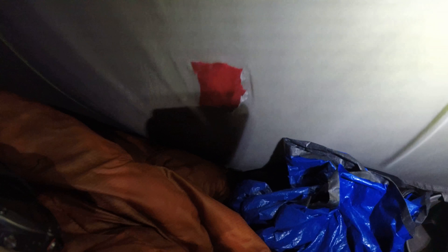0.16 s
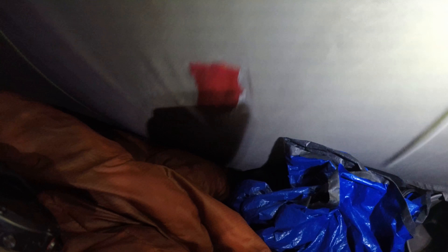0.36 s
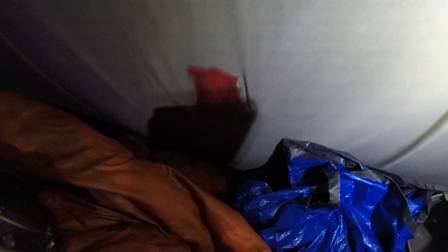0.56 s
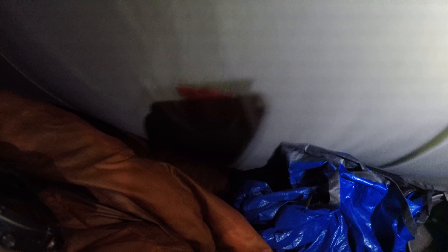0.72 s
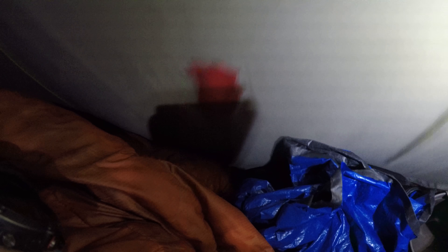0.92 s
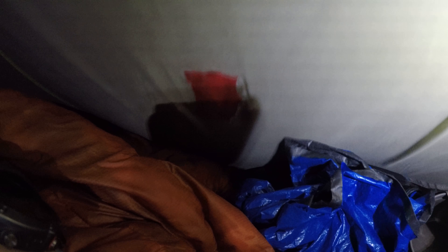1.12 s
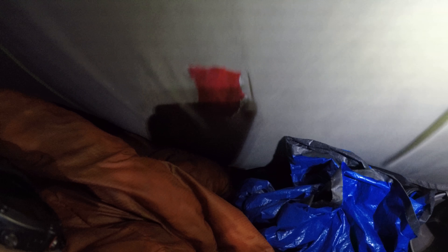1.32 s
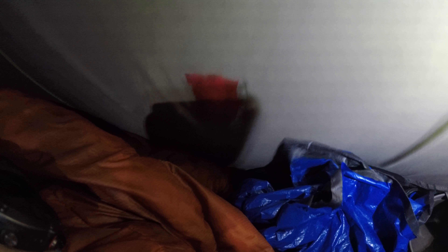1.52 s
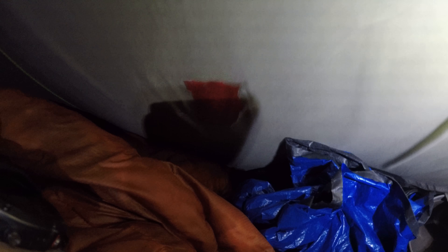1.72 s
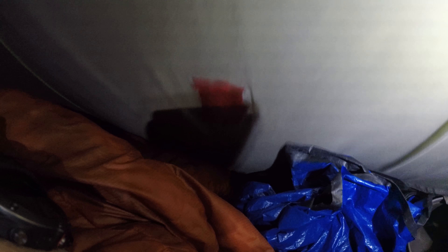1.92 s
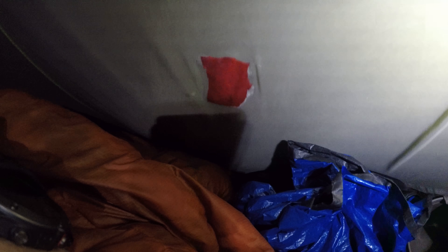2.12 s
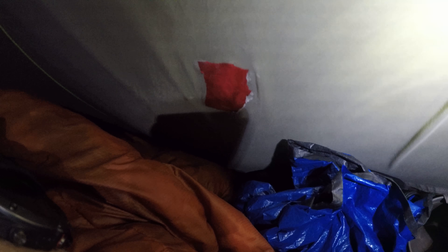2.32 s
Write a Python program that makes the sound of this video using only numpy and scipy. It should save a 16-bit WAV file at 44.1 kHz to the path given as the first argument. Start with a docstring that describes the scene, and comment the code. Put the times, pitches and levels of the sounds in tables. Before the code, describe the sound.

Strong wind buffets a tent, heard from inside close to the wall. A deep rumble swells quickly, and the cloth shakes in fast, uneven flaps with crackling creases, dull knocks and sharp snaps over rushing air.

```python
"""Inside a tent, close to the wall, in strong wind. Gusts pump the wall, which rumbles, and shake
the cloth in quick, uneven flaps. Each flap thuds and stirs up crackling creases over the rush of
air on the fabric. Now and then a fold pops through with a dull knock, or the cloth snaps taut.
Only a thin, high sizzle is spread between left and right; the rest sits in the middle."""
import sys
import numpy as np
from scipy import signal
from scipy.fft import rfft, irfft
from scipy.io import wavfile
from scipy.ndimage import uniform_filter1d, map_coordinates

SR = 44100
rng = np.random.default_rng(int(sys.argv[2]) if len(sys.argv) > 2 else 0)


def wav_out(sig):
    """Save sig, one row per channel (or a flat mono array), as 16-bit PCM at SR to the path in sys.argv[1]."""
    wavfile.write(sys.argv[1], SR, np.round(np.clip(np.atleast_2d(sig).T, -1, 1) * 32767).astype(np.int16))


N = 104384

# Levels in the tables are relative: each layer is turned up or down as it is mixed.
# how hard the gusts pump the wall (t/s, level/dB)
RUMBLE_LEVEL = [(0.12, -50), (0.28, -17), (0.31, -23.5), (0.59, -13.5), (0.68, -20), (0.78, -11),
                (0.81, -19), (0.84, -10.5), (1.16, -12.5), (1.41, -18.5), (1.46, -15), (1.54, -15.5),
                (1.61, -11), (1.7, -17.5), (1.9, -12), (1.93, -21.5), (2.05, -12), (2.19, -24),
                (2.22, -14.5), (2.35, -20)]
# tone of the rumbling wall (f/Hz, level/dB)
RUMBLE_TONE = [(11, -28), (18, 1.5), (74, 1.5), (164, -3.5), (240, -12.5), (310, -41.5), (530, -120)]
# how hard the cloth drums (t/s, level/dB)
DRUM_LEVEL = [(0.12, -57.5), (0.29, -23), (0.52, -29.5), (0.57, -19.5), (0.69, -28.5), (0.7, -25),
              (1.03, -18), (1.44, -27.5), (1.45, -20.5), (1.49, -28.5), (1.55, -21.5), (1.58, -23.5),
              (1.6, -18), (1.63, -27), (1.64, -20), (1.74, -30), (1.8, -22), (1.85, -27.5), (1.88, -19),
              (1.93, -27.5), (1.94, -23.5), (2.03, -29), (2.04, -21.5), (2.08, -24.5), (2.09, -19.5),
              (2.13, -28), (2.33, -19.5), (2.35, -30)]
# tone of the drumming cloth (f/Hz, level/dB)
DRUM_TONE = [(130, -28.5), (220, 0.5), (382, -5), (500, -4.5), (638, -6), (757, -7.5), (877, -14.5),
             (950, -19), (1240, -41), (2090, -120)]
# how loudly the gusts rustle the cloth (t/s, level/dB)
RUSTLE_LEVEL = [(0.12, -60.5), (0.16, -48.5), (0.22, -45.5), (0.27, -32), (0.34, -36), (0.35, -33),
                (0.47, -33.5), (0.48, -28), (0.49, -35), (0.57, -20.5), (0.66, -32.5), (0.71, -22.5),
                (0.73, -28.5), (0.74, -21), (0.79, -24.5), (0.87, -19.5), (0.97, -26), (0.99, -20),
                (1.01, -24), (1.12, -24.5), (1.14, -29), (1.15, -23.5), (1.26, -28), (1.28, -23),
                (1.3, -32), (1.33, -26.5), (1.39, -33), (1.44, -32), (1.45, -24.5), (1.46, -31),
                (1.53, -30), (1.55, -22), (1.66, -24.5), (1.67, -28.5), (1.74, -34.5), (1.78, -29),
                (1.9, -25), (1.91, -29), (2.09, -28), (2.13, -38), (2.25, -23), (2.26, -27.5),
                (2.34, -24.5), (2.35, -32.5)]
# tone of the rustle and the snaps (f/Hz, level/dB)
RUSTLE_TONE = [(530, -44.5), (900, -6), (1480, 0.5), (2150, -9.5), (2450, -8.5), (2880, -10.5), (5210, -12),
               (6180, -20.5), (8450, -20.5), (11100, -39), (11800, -42), (15300, -58), (22000, -120)]
# treble of the rustle and the snaps, opening during the first second (t/s, level/dB)
TREBLE_GAIN = [(0.15, -7), (0.4, -6.5), (0.6, -3), (0.85, 0.5), (1.3, 1), (2.3, -0.5)]
# folds popping through (t/s, knock level/dB, knock f/Hz, upper ring level/dB)
FOLD_POPS = [(0.357, -8, 337, -31), (0.565, -11, 650, -16), (0.769, -11, 328, -12), (0.989, -10, 590, -17),
             (1.058, -15, 301, -22), (1.08, -7, 426, -15), (1.148, -21, 490, -13), (1.194, -10, 436, -12),
             (1.605, -6, 342, -16.5), (1.882, -7, 350, -35), (2.042, -13, 323, -24), (2.091, -10, 616, -28)]
# the cloth snapping taut (t/s, level/dB)
TAUT_SNAPS = [(0.4747, -15), (0.549, -5), (0.5657, -8), (0.5804, -11), (0.6144, -13), (0.705, -6),
              (0.7414, -17), (0.876, -5), (0.911, -9), (1.056, -11), (1.1104, -7), (1.1436, -5),
              (1.171, -6), (1.181, -14), (1.2794, -21), (1.4451, -9), (1.5993, -17), (1.635, -17),
              (1.653, -6.5), (1.8624, -5), (1.883, -8), (1.8964, 0), (2.0655, -7), (2.251, -15)]
# loudness of the thin sizzle on top of the rustle (t/s, level/dB)
SIZZLE_LEVEL = [(0.17, -88), (0.48, -86), (0.53, -86), (1.33, -53), (1.44, -61), (1.45, -51), (1.49, -60),
                (1.6, -47), (1.75, -61), (1.89, -45), (1.91, -56.5), (1.96, -50), (2.08, -53), (2.14, -62),
                (2.32, -54), (2.35, -58)]
# tone of that sizzle (f/Hz, level/dB)
SIZZLE_TONE = [(6880, -44), (11700, -1.5), (12400, 10), (13000, 7.5), (15500, 1)]


def undb(db):
    """Turn decibels into a number to multiply by."""
    return 10 ** (np.asarray(db) / 20)


def unit(x):
    """Scale a signal so that its average strength (rms) is 1."""
    return x / np.sqrt(np.mean(x ** 2) + 1e-18)


def curve(table):
    """Join rows of (t/s, level/dB) into a volume curve."""
    seconds, db = np.array(table).T
    return undb(np.interp(np.arange(N) / SR, seconds, db))


def colour(x, tone):
    """Filter through rows of (f/Hz, level/dB); white noise keeps its power."""
    size = 2 * N
    hz, db = np.array(tone).T
    bin_hz = np.arange(N + 1) * SR / size
    gain = unit(undb(np.interp(np.log(bin_hz + 1), np.log(hz), db)))
    # make the filter ring only after a click, never before it
    cepstrum = irfft(np.log(gain + 1e-5))
    cepstrum[1:N] *= 2
    cepstrum[N + 1:] = 0
    return irfft(rfft(x, size) * np.exp(rfft(cepstrum)))[:N]


def wander(per_s):
    """Drift smoothly between random values, typically about 1 away from zero."""
    steps = rng.standard_normal(2048)
    return unit(map_coordinates(steps, [np.arange(N) / SR * per_s], order=3, mode="wrap"))


def clicks(per_s, scatter_db):
    """Pushes at random times; more scatter makes their sizes less even."""
    hits = rng.random(N) < per_s / SR
    return hits * undb(scatter_db * np.clip(rng.standard_normal(N), -2, 2))


def grains(pushes):
    """Flip each push up or down at random and scale the result to strength 1."""
    return unit(pushes * np.sign(rng.standard_normal(N)))


def burst(start_s, rise_s, decay_s):
    """Rise quickly to 1, then die away."""
    age = np.maximum(np.arange(N) / SR - start_s, 0)
    shape = (1 - np.exp(-age / rise_s)) * np.exp(-age / decay_s)
    return shape / (shape.max() + 1e-12)


def steady(x, seconds):
    """Hold the strength near 1 over the given time, so the gusts set the slow swells."""
    power = uniform_filter1d(x ** 2, int(seconds * SR))
    return x / np.sqrt(np.abs(power) + 1e-9)


def wall_rumble():
    """Gusts push the whole wall, which pumps the air inside."""
    rumble = colour(rng.standard_normal(N), RUMBLE_TONE)
    return steady(rumble, seconds=0.053) * curve(RUMBLE_LEVEL)


def drumming(flaps, motion):
    """Thudding flaps and small ripples drum on the cloth."""
    thuds = grains(flaps)
    ripples = unit(grains(clicks(per_s=600, scatter_db=-1.5)) * motion)
    drum = colour(ripples + 0.35 * thuds, DRUM_TONE)
    return undb(0.5) * steady(drum, seconds=0.0476) * curve(DRUM_LEVEL)


def tick():
    """The volume curve of one faint, high tick as the wind sets in."""
    return undb(-46) * burst(0.12, rise_s=0.0006, decay_s=0.008)


def panel_flutter(x):
    """Different panels take turns: each octave wavers slowly and flutters fast on its own."""
    spectrum = rfft(x)
    octave = np.log2(np.arange(N // 2 + 1) * SR / N + 1)
    lowest = np.floor(np.log2(RUSTLE_TONE[0][0]))
    panels = np.zeros(N)
    for centre in np.arange(lowest, np.ceil(octave[-1]) + 1):
        band = irfft(spectrum * np.maximum(1 - abs(octave - centre), 0), N)
        panels += band * undb(0.46 * wander(per_s=20) + 1.29 * wander(per_s=150))
    return panels


def rustle(motion, creases):
    """Air rushes over the cloth and creases crackle, both swelling with each flap."""
    rush = undb(-1) * rng.standard_normal(N)
    crackle = undb(-5.5) * creases
    cloth = colour((rush + crackle) * motion, RUSTLE_TONE)
    return panel_flutter(cloth) * curve(RUSTLE_LEVEL)


def open_treble(cloth, above_hz=5640):
    """The cloth starts out dull and grows brighter during the first second."""
    dull = signal.sosfiltfilt(signal.butter(8, above_hz, fs=SR, output="sos"), cloth)
    return dull + (cloth - dull) * curve(TREBLE_GAIN)


def fold_knocks(upper_hz=1393):
    """A fold pops through: its patch rings briefly at its own pitch and at the cloth's upper note."""
    knocks = np.zeros(N)
    for start, db, hz, upper_db in FOLD_POPS:
        age = np.arange(N) / SR - start
        low = undb(db - 2.5) * np.sin(2 * np.pi * hz * age)
        upper = undb(upper_db - 0.5) * np.sin(2 * np.pi * upper_hz * age)
        knocks += (low + upper) * burst(start, rise_s=0.0011, decay_s=0.0025)
    return knocks


def snaps(low_cut_hz=1900):
    """The cloth pulls taut with a short, bright crack."""
    level = sum(undb(db - 12.5) * burst(start, rise_s=0.0006, decay_s=0.0029)
                for start, db in TAUT_SNAPS)
    cracks = colour(level * rng.standard_normal(N), RUSTLE_TONE)
    low_cut = signal.butter(2, low_cut_hz, "high", fs=SR, output="sos")
    return signal.sosfilt(low_cut, cracks)


def sizzle(motion, creases, width=0.94):
    """The thin top of the rustle, in stereo: it gives the opening tick, then slowly swells."""
    level = undb(4) * curve(SIZZLE_LEVEL) * motion + tick()
    hiss = unit(rng.standard_normal(N) + undb(-10) * creases)
    middle = colour(hiss * level, SIZZLE_TONE)
    side = colour(rng.standard_normal(N) * level, SIZZLE_TONE)
    return np.array([middle + width * side, middle - width * side])


def scene(wind_start_s=0.11, fade_in_s=0.025, steady_share=0.66):
    """The wind sets in, and one run of flaps moves the drumming, rustle and sizzle together."""
    flaps = clicks(per_s=150, scatter_db=0)
    flap_shape = burst(0, rise_s=0.0015, decay_s=0.0035)
    shake = unit(signal.fftconvolve(flaps, flap_shape)[:N])
    motion = steady(steady_share + (1 - steady_share) * shake, seconds=0.029)
    creases = grains(clicks(per_s=1800, scatter_db=5))
    wall = wall_rumble() + drumming(flaps, motion)
    cloth = open_treble(rustle(motion, creases) + snaps())
    fade_in = np.clip((np.arange(N) / SR - wind_start_s) / fade_in_s, 0, 1)
    return fade_in * (wall + cloth + fold_knocks() + sizzle(motion, creases))


def record(dry, knee=0.6, ceiling=0.97, cut_hz=15300):
    """Gently round off peaks above the knee, then cut the highest treble."""
    under = np.clip(dry, -knee, knee)
    headroom = ceiling - knee
    rounded = under + headroom * np.tanh((dry - under) / headroom)
    high_cut = signal.ellip(10, 0.2, 80, cut_hz, fs=SR, output="sos")
    return signal.sosfilt(high_cut, rounded)


dry = scene()
out = record(dry)
wav_out(out)
```